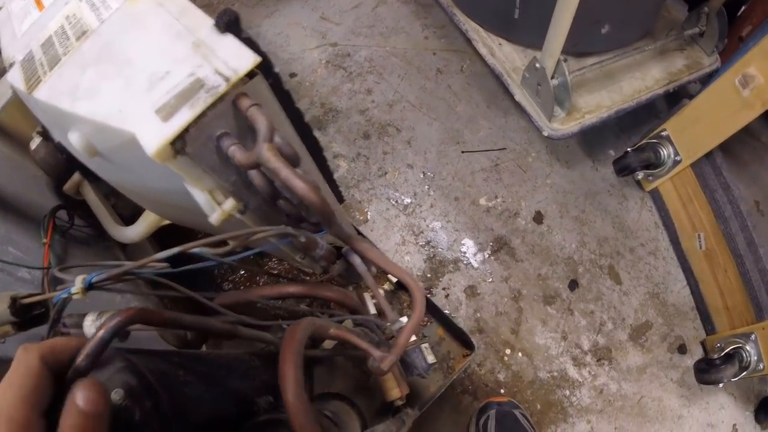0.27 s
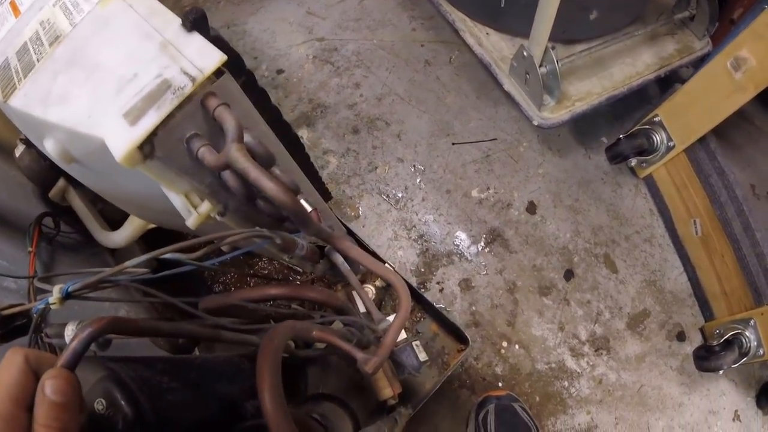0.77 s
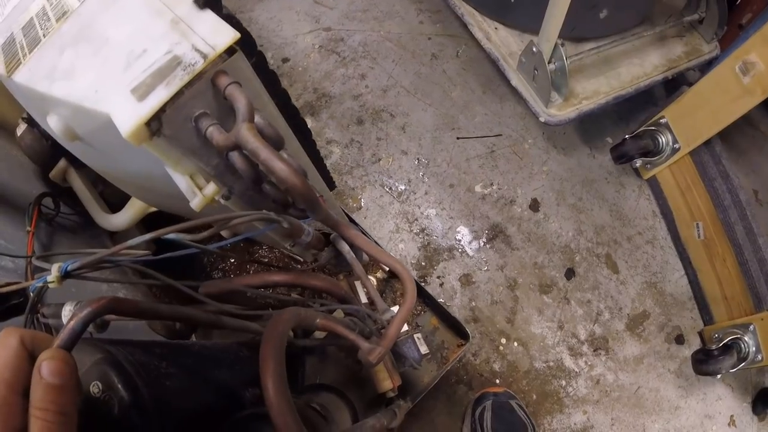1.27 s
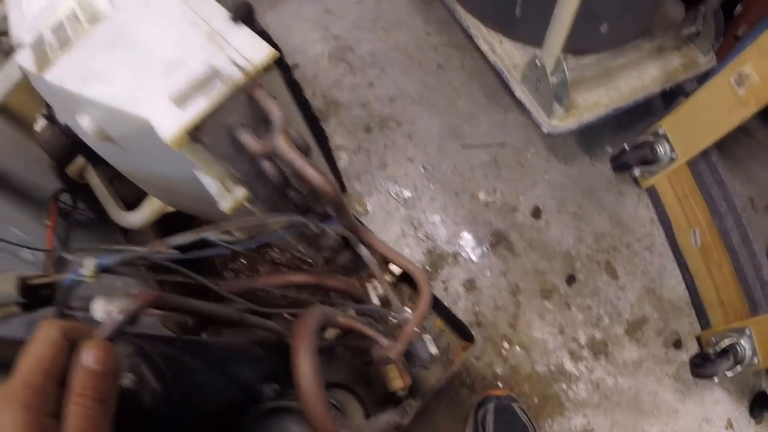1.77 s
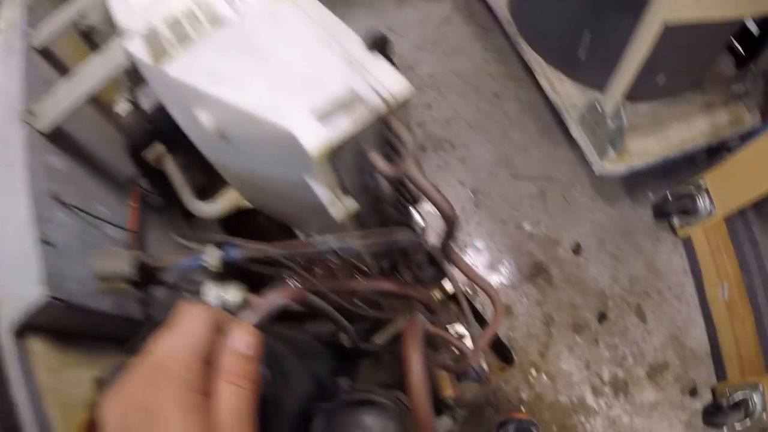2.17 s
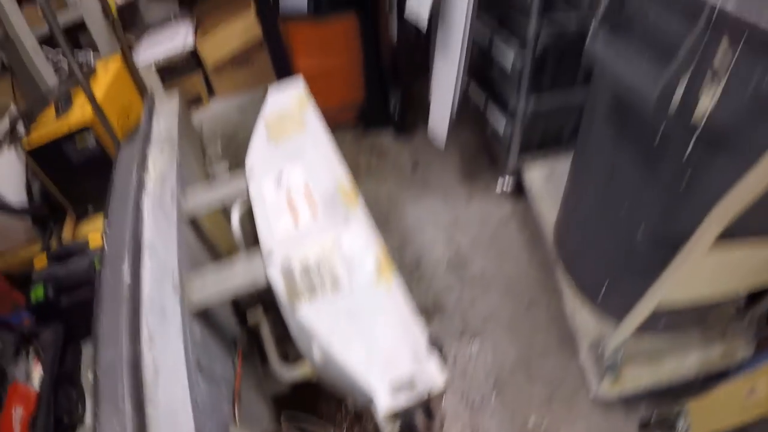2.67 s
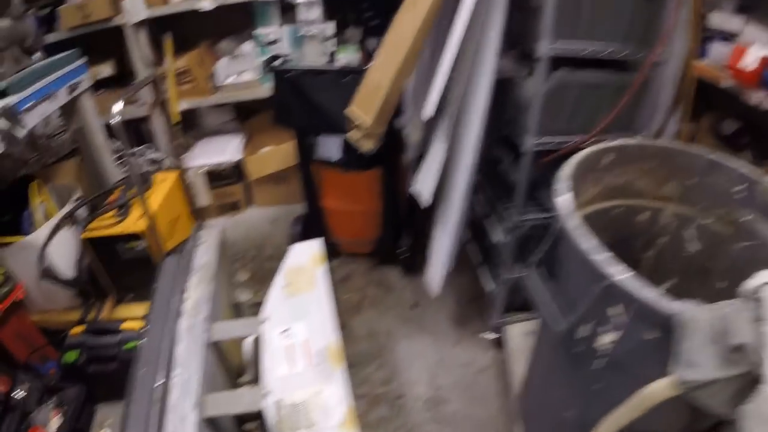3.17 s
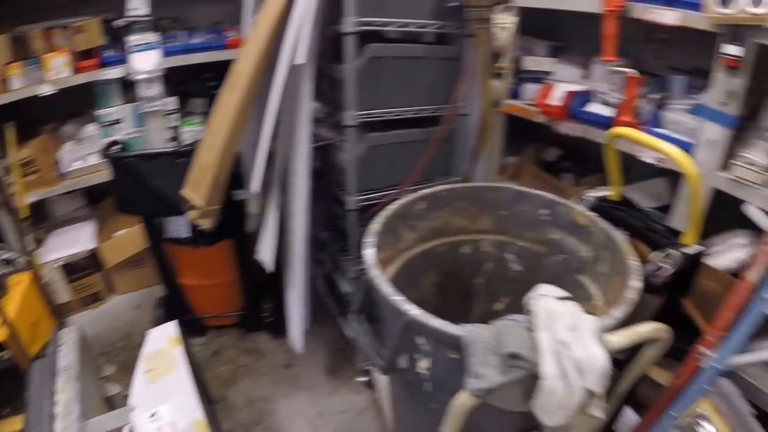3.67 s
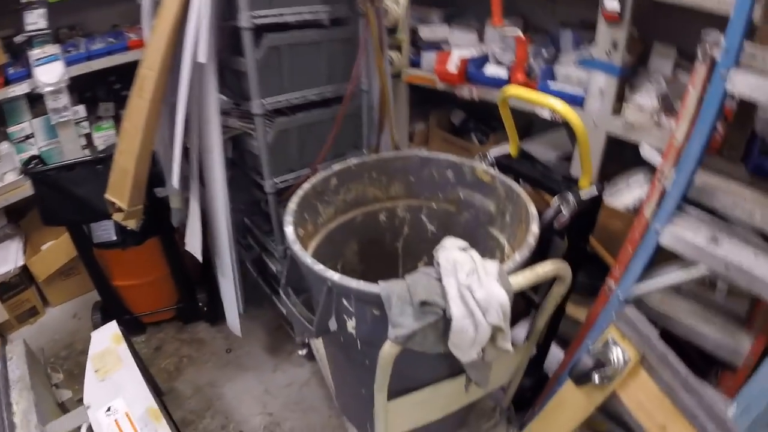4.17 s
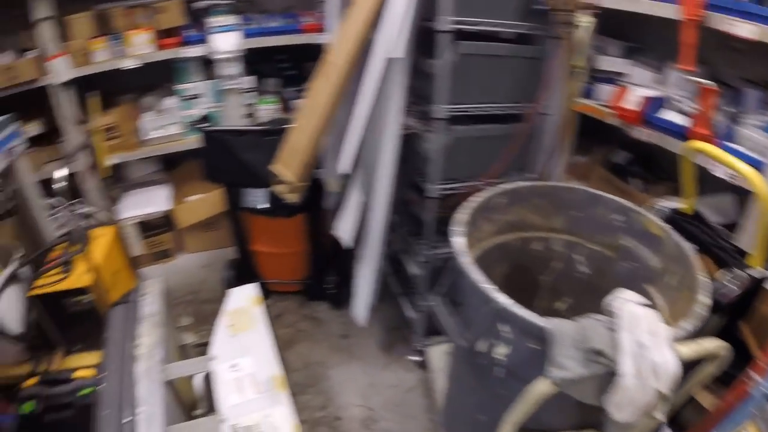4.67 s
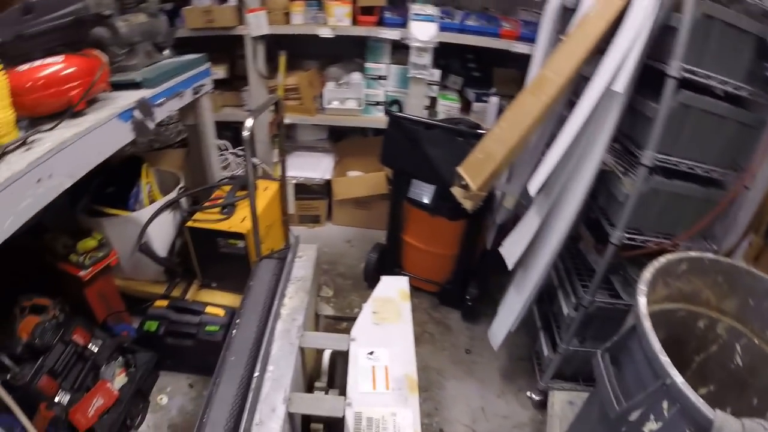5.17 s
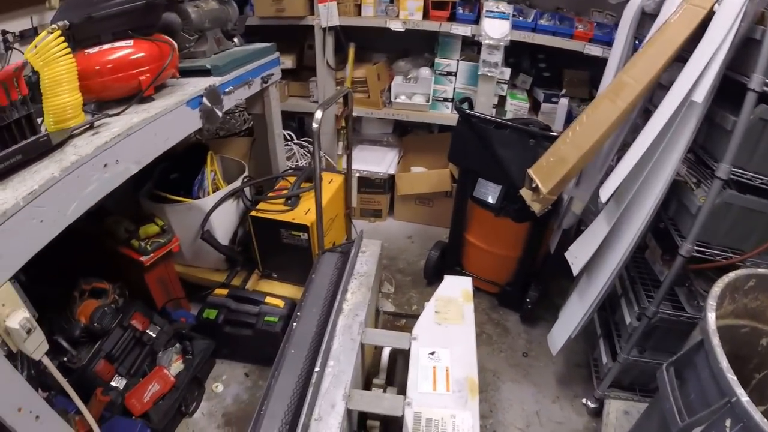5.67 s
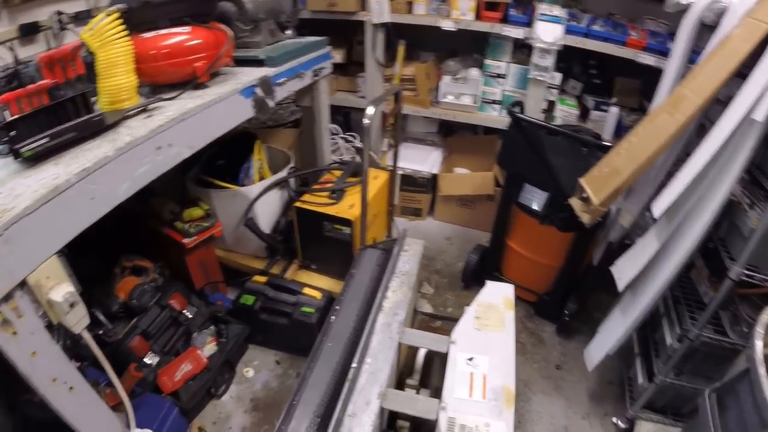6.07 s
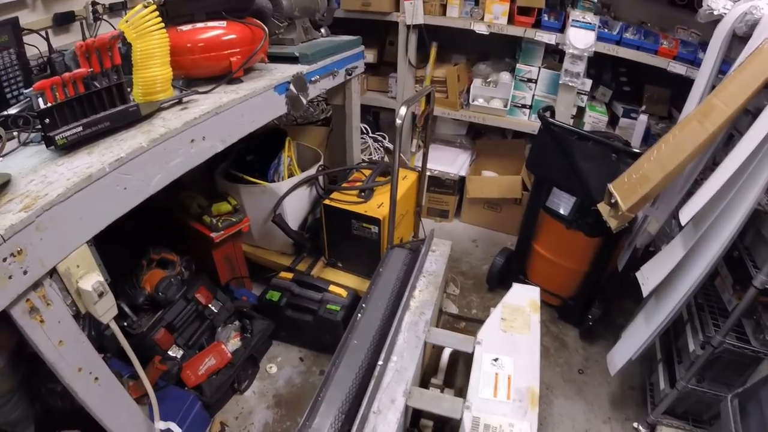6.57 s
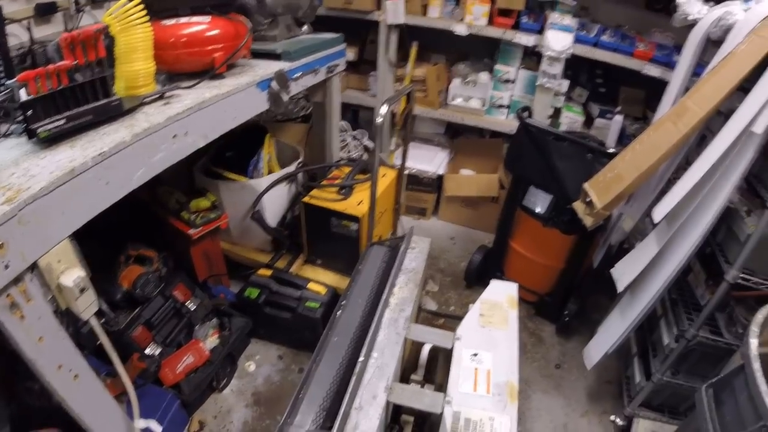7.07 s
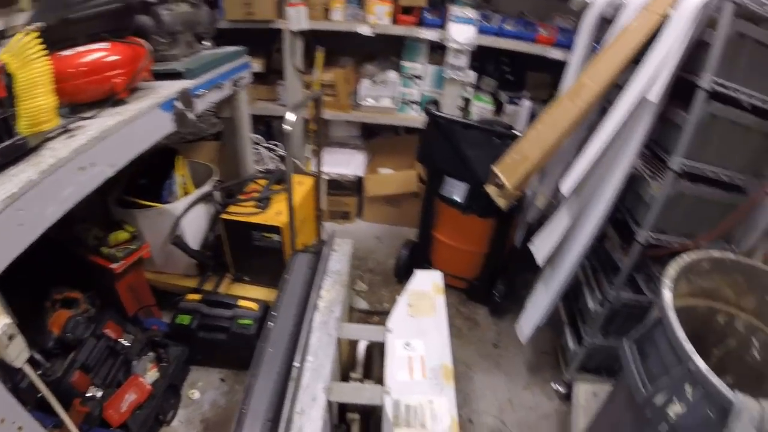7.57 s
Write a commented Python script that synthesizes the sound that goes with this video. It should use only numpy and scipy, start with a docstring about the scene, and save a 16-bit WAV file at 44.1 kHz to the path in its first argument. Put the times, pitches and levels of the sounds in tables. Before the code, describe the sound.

An air conditioner runs steadily with a throbbing fan hum, rushing air and a fine metallic compressor rattle.

```python
"""An open air conditioner in a workshop

The unbalanced fan shakes the casing once a turn, a throbbing hum, and blows a steady rush of air.
Each compressor stroke rings its steel shell and drives gas through a pipe; the clutter returns echoes.
A hand-held camera starts over the pipes, lifts away and looks right, then left; levels and echoes
follow that move. As it turns through the draught it is buffeted and softly bumped."""
import sys
import numpy as np
from scipy.fft import rfft, irfft, next_fast_len
from scipy.io import wavfile
from scipy.ndimage import uniform_filter1d, map_coordinates

SR = 44100
rng = np.random.default_rng(int(sys.argv[2]) if len(sys.argv) > 2 else 0)


def int16_out(signal):
    """Quantize to a 16-bit WAV file."""
    q = np.round(np.clip(np.atleast_2d(signal).T, -1, 1) * 32767)
    wavfile.write(sys.argv[1], SR, q.astype(np.int16))


N = 344421

FAN_HZ, COMPRESSOR_HZ, MAINS_HZ = 27.23, 58.385, 60

# The fan's harmonics. Each entry: a multiple of the rotation rate.
STRONG_ORDERS = [6, 7, 8, 9, 10, 12]
WEAK_ORDERS = [3, 5, 11, 15, 26, 28, 30, 34]
# Standing waves of the strong orders. Each row: base level in dB, then dB gained when lifted,
# facing right and passing the casing.
STRONG_LOBES = [(-36.5, -2.5, -0.5, 5), (-40, -11, 2.5, 7.5), (-48.5, 6.5, -1.5, 2), (-33.5, -1.5, -1, -2),
                (-36.5, 2, -7.5, 1), (-40, 2.5, -2, -1.5)]
# Each entry: the level of a weak order in dB.
WEAK_DB = [-77, -62, -62, -52, -51.5, -57.5, -56, -58.5]


def fan_hum(turns, view, scatter_rad, flutter_db):
    """Rotating unbalance: harmonics peak together once a turn, loosened by the room's standing waves."""
    strong_db = [lobed_db(level, view) for level in STRONG_LOBES]
    hum = np.zeros(N)
    for order, db in zip(STRONG_ORDERS + WEAK_ORDERS, strong_db + WEAK_DB):
        phase = 2 * np.pi * order * turns + scatter_rad * wobble(0.99)
        hum += amp(db + flutter_db * wobble(7.8)) * np.sqrt(2) * np.cos(phase)
    return hum


# Spectra of the moving air. Each row: frequency in Hz, relative density in dB.
CASING_BOOM = [(25, -55), (55, -50), (85, -29), (118, -26.5), (145, -2), (200, 0), (260, 2.5), (320, -3.5),
               (420, -21.5), (800, -71)]
DUCT_ROAR = [(200, -56), (330, 0.5), (400, 1), (480, -3), (570, -9), (800, -33), (1500, -54)]
BLADE_RUSH = [(300, -61), (510, -3.5), (580, 2.5), (700, 7), (790, 2), (880, 2.5), (1000, 0), (1150, 1),
              (1350, -13), (2000, -71)]
CASING_HOLLOW = [(250, -120), (420, -25), (490, 3), (540, -13), (620, -6), (720, -14), (810, -5), (885, 2),
                 (960, -7), (1080, -25), (1600, -120)]
COIL_HISS = [(700, -30), (1300, -1.7), (1580, 2), (2000, -4), (2900, -4.5), (3950, -8.5), (4500, -15),
             (5300, -18), (6400, -22.5), (7500, -26.5), (9000, -30.3), (10500, -29.5), (12000, -38),
             (15000, -50)]
# Each lists: base level in dB, dB gained when lifted, dB gained facing right, dB per dB of exposure.
BOOM_LEVEL = (-34.5, 0, -1.5, 0.9)
ROAR_LEVEL = (-37, 1.63, 0.5, 1)
HISS_LEVEL = (-41.4, 0.5, 0.2, 1)
# The rush off the blades. Each row: time in seconds, level in dB.
RUSH_LEVEL = [(0, -36.5), (2.4, -38), (3.0, -42), (3.4, -42), (4.5, -36.8), (4.9, -39), (5.3, -37.5),
              (5.7, -39.5), (6.5, -39), (7.2, -41.5), (7.8, -39.5)]


def fan_air(turns, view, throb):
    """Turbulence: broadband noise from the casing, the duct, the blades and the coil."""
    surge = 1 + throb * np.cos(2 * np.pi * turns)  # the wheel runs out of true
    boom = amp(heard_db(BOOM_LEVEL, view) + 0.45 * wobble(8.4)) * unit(surge * noise(CASING_BOOM))
    roar = amp(heard_db(ROAR_LEVEL, view) + 0.28 * wobble(15)) * unit(surge * noise(DUCT_ROAR))
    rush_db, = curves(RUSH_LEVEL)
    rush = amp(rush_db + 0.53 * wobble(12)) * noise(BLADE_RUSH)
    lift, _, _ = view
    hollow = amp(-40.5) * (1 - lift) * noise(CASING_HOLLOW)  # cavity resonances, heard only close by
    hiss = amp(heard_db(HISS_LEVEL, view) + 0.7 * wobble(11)) * noise(COIL_HISS)
    return boom + roar + rush + hollow + hiss


def compressor(view, hunt_hz, jitter_turns, rough_db):
    """Periodic excitation: strokes drive shell and pipe; the speed hunts at twice the motor's slip."""
    lift, heading, _ = view
    slip_hz = MAINS_HZ - COMPRESSOR_HZ
    speed_hz = COMPRESSOR_HZ + hunt_hz * np.cos(2 * np.pi * 2 * slip_hz * clock())
    lag_turns = 0.0355 * lift + 0.0533 * heading  # strokes arrive later from further away
    turns = np.cumsum(speed_hz) / SR + jitter_turns * wobble(60) - lag_turns
    # Echo patterns passed through: a slow drift at rest, quick changes as the camera lifts or swings.
    travel = np.cumsum(0.4 / SR + 4 * abs(np.gradient(lift)) + 3 * abs(np.gradient(heading)))
    knocks = shell_knocks(turns, travel, view)
    gas = discharge_pipe(turns, travel, lift, pumping=0.56)
    ticks = shell_ticks(turns, travel, rebound_turns=0.197, scatter_db=1.0)
    tones = shell_tones(turns, travel, view)
    return (knocks + gas + ticks + tones) * amp(rough_db * wobble(58))


# Shell modes. Each row: frequency in Hz, width in Hz, moment in turns, relative level in dB.
KNOCK_MODES = [(1000, 18, 0.01, -16), (1089, 31, 0, -4), (1238, 67, 0.02, -6)]
RATTLE_MODES = [(2210, 220, .63, 8.5), (2957, 270, .88, 4.5), (4535, 45, 0.0222, -5)]
# Each lists: base gain in dB, dB gained when lifted, dB gained facing right, dB per dB of exposure.
KNOCK_GAIN = (-37.5, -6.5, 1, 0.2)
RATTLE_GAIN = (-55, -3, 1, 1.5)


def shell_knocks(turns, travel, view):
    """Modal ringing: the low modes knock, mostly direct; the higher ones rattle, mostly as echoes."""
    knock = ring_modes(turns, travel, KNOCK_MODES, glide=0, room=0.16, decay=0.11)
    rattle = ring_modes(turns, travel, RATTLE_MODES, glide=0.023, room=2.5, decay=0.36)
    return amp(heard_db(KNOCK_GAIN, view)) * knock + amp(heard_db(RATTLE_GAIN, view)) * rattle


# The shell's three whistling modes. Each row: frequency in Hz, width in Hz, moment in turns,
# rebound relative to the tick in dB.
TICK_MODES = [(3660, 70, -.01, -20), (3835, 85, .01, -13), (4180, 125, -.07, -1.5)]
# Their reflections off casing and clutter. Each row: frequency in Hz, width in Hz, moment in turns,
# relative level in dB.
TICK_ECHOES = [(3700, 130, 0.05, -10), (3880, 90, .1, -6), (4190, 90, .12, -6.5)]
# Each mode has its own lobes; facing away leaves mostly echoes. Each row: time in seconds,
# levels of the low, middle and high mode in dB, gain of the echoes in dB.
TICK_LEVELS = [(0, -46.5, -50, -46.5, -47.5), (1.4, -44.5, -50, -44, -46.5), (1.8, -48.5, -49, -50, -49.5),
               (2.25, -47.5, -51.5, -59, -51), (2.6, -48, -51, -55, -48.5), (3.1, -60, -63, -59, -51.5),
               (3.75, -62, -49.5, -57, -49.5), (4.6, -53, -53, -55, -47.5), (5.1, -58, -46.5, -49, -47),
               (5.6, -56, -43.5, -53, -48.5), (6.6, -56, -44.5, -56, -48.5), (7.3, -57, -49, -57, -50.5),
               (7.8, -59, -47.5, -51, -49)]


def shell_ticks(turns, travel, rebound_turns, scatter_db):
    """Impact and reflection: each stroke gives an uneven metallic tick, a rebound and a smear of echoes."""
    *tick_db, echo_db = curves(TICK_LEVELS)

    def strike(*mode):
        force = amp(scatter_db * wobble(COMPRESSOR_HZ))
        return force * ring(turns, travel, mode, glide=0.0087, room=0.13, decay=0.16)

    ticks = np.zeros(N)
    for (hz, width, moment, rebound_db), db in zip(TICK_MODES, tick_db):
        tick = strike(hz, width, moment)
        rebound = amp(rebound_db) * strike(hz, width, moment + rebound_turns)
        ticks += amp(db) * unit(tick + rebound)
    smear = ring_modes(turns, travel, TICK_ECHOES, glide=0, room=1, decay=0.42, direct=0)
    return ticks + amp(echo_db) * smear


# Narrow, high ringing tones of the shell. Each row: frequency in Hz, width in Hz, moment in turns,
# base level in dB, then dB gained when lifted, facing right and passing the casing.
TONE_MODES = [(3260, 55, .1, -62, 3, -1, 0), (3570, 34, .12, -53.5, 0, 5, 7.5),
              (4055, 42, .25, -52.5, 3, 0, -1), (4630, 48, .15, -66, 6, -1, 7)]


def shell_tones(turns, travel, view):
    """Directional radiation: each narrow, high mode has its own lobes around the machine."""
    _, _, exposure_db = view
    tones = np.zeros(N)
    for hz, width, moment, *level in TONE_MODES:
        tone = ring(turns, travel, (hz, width, moment), glide=0, room=0.15, decay=0.28)
        tones += amp(lobed_db(level, view) + exposure_db) * tone
    return tones


# Pipe resonances. Each row: frequency in Hz, width in Hz, moment in turns, relative level in dB.
PIPE_MODES = [(4900, 50, 0.02, -6), (5150, 66, 0.12, 1.5), (6380, 170, 0.3, -10)]
# Flow noise of the gas. Each row: frequency in Hz, relative density in dB.
GAS_SPECTRUM = [(3000, -28), (4300, -17), (4700, -3), (5100, 5), (5700, -3.5), (6300, -2), (7200, -13.5),
                (10000, -39), (14000, -60)]
# The pipe is soon hidden as the camera lifts. Each row: time in seconds, gain in dB.
PIPE_GAIN = [(0, -54.3), (1.4, -53.5), (2.0, -55), (2.35, -61), (3.6, -62), (4.3, -57), (4.7, -56.5),
             (6.5, -58), (7.3, -58.5), (7.8, -55.5)]


def discharge_pipe(turns, travel, lift, pumping):
    """Pulsating flow: every stroke rings the pipe and pushes a hissing puff of gas through it."""
    ringing = ring_modes(turns, travel, PIPE_MODES, glide=0.02, room=0.5, decay=0.32)
    ringing *= amp(-8 * lift)  # sinks into the gas noise once lifted
    flow = np.exp(pumping * np.cos(2 * np.pi * turns))
    puffs = amp(1.7 * wobble(10)) * unit(flow * noise(GAS_SPECTRUM))
    gain_db, = curves(PIPE_GAIN)
    return amp(gain_db) * (ringing + puffs)


def ring(turns, travel, mode, glide, room, decay, direct=1):
    """Resonance: a mode rung once a turn, plus room echoes that die with time constant decay, in turns."""
    hz, width, moment = mode
    size, patterns = 2048, 24  # points per turn, echo patterns
    order = np.arange(size // 2 + 1)
    offset = order - hz / COMPRESSOR_HZ
    # Higher partials come later, by glide turns per order, so the ring chirps upward.
    chirp = np.exp(-2j * np.pi * glide * offset ** 2 / 2)
    tail = np.exp(-np.arange(size) / size / decay)
    echoes = rfft(rng.standard_normal((patterns, size)) * tail / np.linalg.norm(tail))
    band = np.exp(-(offset * COMPRESSOR_HZ / width) ** 2 / 2 - 2j * np.pi * order * moment)
    cycles = irfft(band * (direct * chirp + room * echoes))
    cycles /= cycles.std(axis=1, keepdims=True)
    wave = map_coordinates(cycles, [travel, turns % 1 * size], order=1, mode="grid-wrap")
    power = uniform_filter1d(wave ** 2, size=round(4 * SR / COMPRESSOR_HZ))
    return wave / np.sqrt(power)  # equally loud in every echo pattern


def ring_modes(turns, travel, modes, **shape):
    """Superposition: the modes add, each at its own level."""
    return sum(amp(db) * ring(turns, travel, mode, **shape) for *mode, db in modes)


# Puffs of draught. Each row: start in seconds, time until the fall in seconds, level in dB.
PUFFS = [(-.1, .1, -49), (2.787, 0.83, -44.5)]
# Wind on the microphone. Each row: frequency in Hz, relative density in dB.
BUFFET_SPECTRUM = [(20, -9), (45, -11.5), (80, 0.5), (120, -2), (250, -7.5), (600, -67)]


def draught(rise_s, fall_db_per_s, still_db):
    """Wind noise: each puff rises quickly, holds and dies away, buffeting the microphone."""
    strength = amp(still_db)
    for start, hold, db in PUFFS:
        t = clock() - start
        fall_db = fall_db_per_s * np.maximum(t - hold, 0)
        strength += np.clip(t / rise_s, 0, 1) * amp(db - fall_db)
    return strength * amp(wobble(12)) * noise(BUFFET_SPECTRUM)


# A soft rustle. It lists: centre in seconds, half-width in seconds, level in dB.
RUSTLE = (2.66, 0.16, -41.5)
# Its spectrum. Each row: frequency in Hz, relative density in dB.
RUSTLE_SPECTRUM = [(700, -16), (1400, 11), (2200, 3), (3300, -13), (5000, -22), (9000, -38)]
# Dull bumps. Each row: centre in seconds, frequency in Hz, half-width in seconds, peak in dB.
BUMPS = [(2.829, 161, 0.016, -18.5), (2.873, 36, 0.033, -40), (2.973, 46, 0.011, -22.5)]


def handling():
    """Structure-borne sound: the turning camera's body picks up a rustle and a few bumps."""
    centre, length, db = RUSTLE
    out = amp(db) * swell(centre, length) * noise(RUSTLE_SPECTRUM)
    for centre, hz, length, db in BUMPS:
        out += amp(db) * swell(centre, length) * np.cos(2 * np.pi * hz * (clock() - centre))
    return out


# Where the camera faces. Each row: time in seconds, heading from -1 (left) to 1 (right).
HEADING = [(2.6, -0.21), (3.9, 0.89), (4.4, 0.59), (5.3, -0.69), (6.5, -0.765), (7.2, -0.74), (7.81, -0.14)]
# How openly the machine reaches the microphone. Each row: time in seconds, relative level in dB.
EXPOSURE = [(0, -40), (0.8, -39), (1.7, -40), (2.2, -40.5), (2.7, -40), (3.1, -42.5), (3.8, -43),
            (4.3, -41), (4.8, -39.5), (5.5, -41), (6.6, -41), (7.25, -43), (7.8, -40.5)]


def camera(lift_start_s, lift_length_s):
    """A moving receiver: its lift from 0 to 1, its heading and its exposure in dB about the mean."""
    progress = np.clip((clock() - lift_start_s) / lift_length_s, 0, 1)
    lift = (1 - np.cos(np.pi * progress)) / 2
    heading, = curves(HEADING)
    exposure_db, = curves(EXPOSURE)
    return lift, heading, exposure_db - exposure_db.mean()


def heard_db(level, view):
    """Distance and direction: a part's level follows the camera's lift, heading and exposure."""
    base_db, lifted_db, right_db, follow = level
    lift, heading, exposure_db = view
    return base_db + lifted_db * lift + right_db * heading + follow * exposure_db


def lobed_db(level, view):
    """Interference: a tone's level changes as the camera crosses its loud and quiet zones."""
    base_db, lifted_db, right_db, pass_db = level
    lift, heading, _ = view
    passing_casing = swell(centre_s=2.27, half_width_s=0.25)
    return base_db + lifted_db * lift + right_db * heading + pass_db * passing_casing


def amp(db):
    """Decibels to gain."""
    return 10 ** (np.asarray(db) / 20)


def unit(x):
    """x at rms 1."""
    return x / np.sqrt(np.mean(x ** 2) + 1e-20)


def clock():
    """The time of every sample in seconds."""
    return np.arange(N) / SR


def curves(rows):
    """Linear interpolation: one value per sample for each column after the time."""
    times, *columns = np.transpose(rows)
    return [np.interp(clock(), times, column) for column in columns]


def swell(centre_s, half_width_s):
    """A Gaussian envelope peaking at 1."""
    return np.exp(-((clock() - centre_s) / half_width_s) ** 2)


def wobble(rate):
    """A smooth random curve, rate knots a second."""
    return map_coordinates(rng.standard_normal(int(N * rate / SR) + 4), [clock() * rate])


def filtered(x, response):
    """Linear filtering: the spectrum of x times a frequency response."""
    size = next_fast_len(N + 8192)
    return irfft(rfft(x, size) * response(np.fft.rfftfreq(size, 1 / SR)), size)[..., :N]


def noise(spectrum):
    """Spectral shaping: noise of rms 1, coloured by rows of frequency in Hz and level in dB."""
    knots_hz, db = np.transpose(spectrum)
    white = rng.standard_normal(N)
    return unit(filtered(white, lambda hz: amp(np.interp(np.log(hz + 1), np.log(knots_hz), db))))


def scene():
    """Mid-side stereo: the machine sits in the centre; only a little high hiss spreads to the sides."""
    view = camera(lift_start_s=2.07, lift_length_s=1.075)
    turns = FAN_HZ * clock()
    mid = fan_hum(turns, view, scatter_rad=0.39, flutter_db=0.5)
    mid += fan_air(turns, view, throb=0.075)
    mid += compressor(view, hunt_hz=0.019, jitter_turns=0.00012, rough_db=1.0)
    mid += draught(rise_s=0.08, fall_db_per_s=11.5, still_db=-84)
    mid += handling()
    side = amp(-62) * noise([(3400, -66), (4200, -30), (5200, 8.5), (6400, 7.5),
                             (7500, -6.5), (10000, -10.5), (12000, -31)])
    return np.array([mid + side, mid - side])


def record(dry):
    """Band limiting: the camera keeps nothing above 15.1 kHz."""
    return filtered(dry, lambda hz: hz < 15100)


dry = scene()
out = record(dry)
int16_out(out)
```